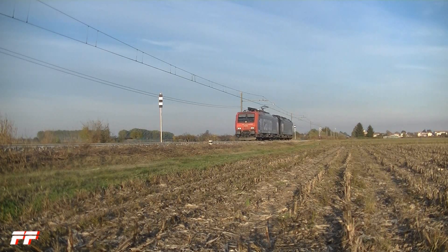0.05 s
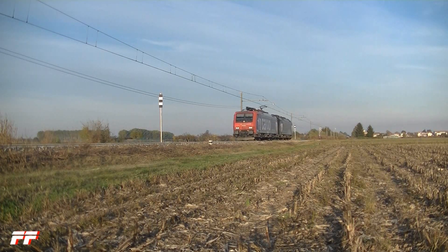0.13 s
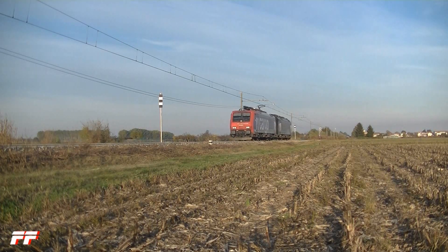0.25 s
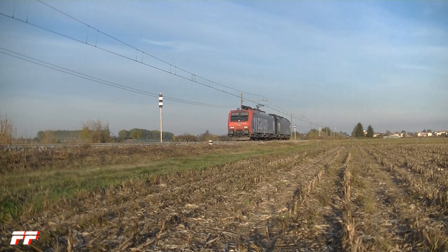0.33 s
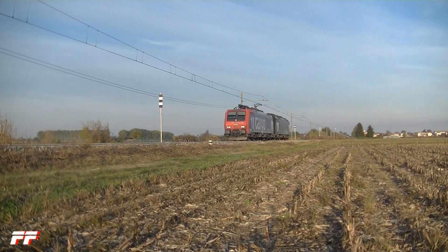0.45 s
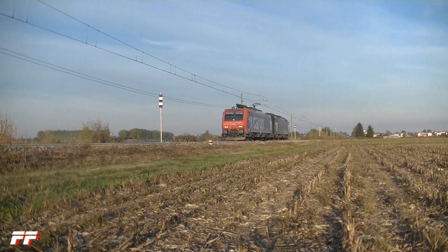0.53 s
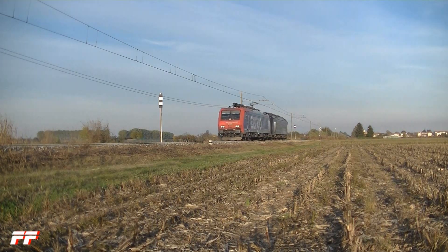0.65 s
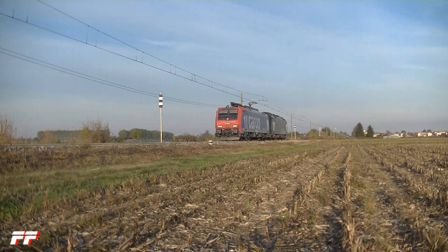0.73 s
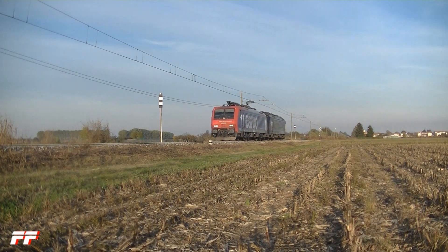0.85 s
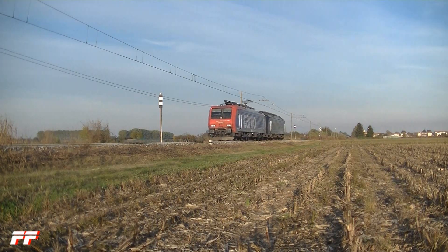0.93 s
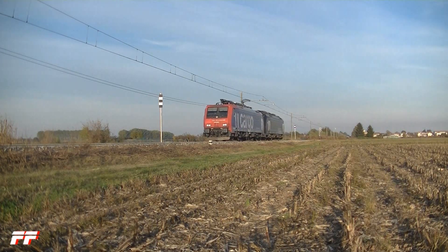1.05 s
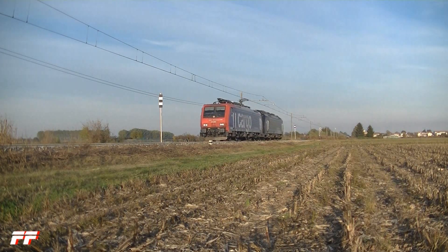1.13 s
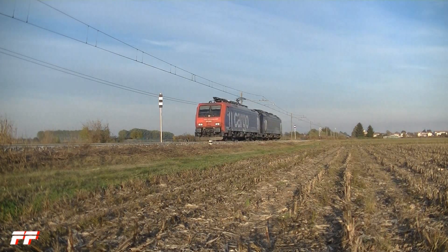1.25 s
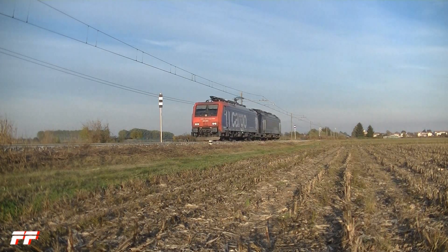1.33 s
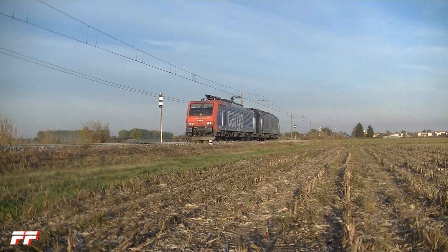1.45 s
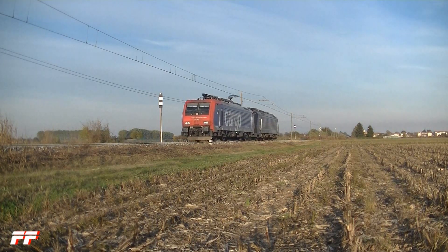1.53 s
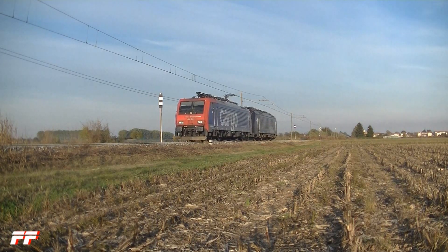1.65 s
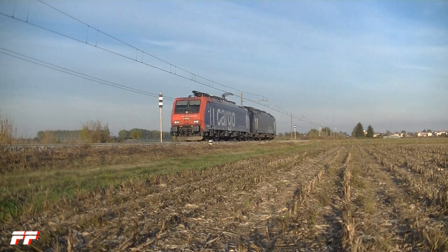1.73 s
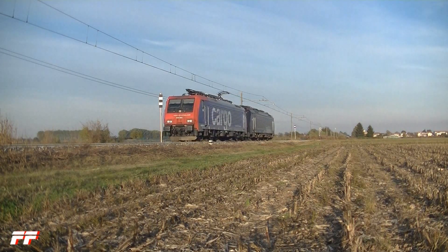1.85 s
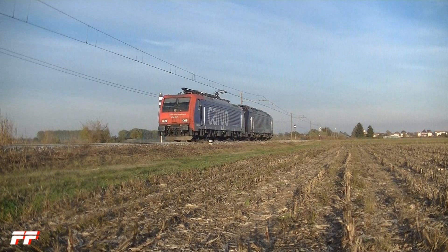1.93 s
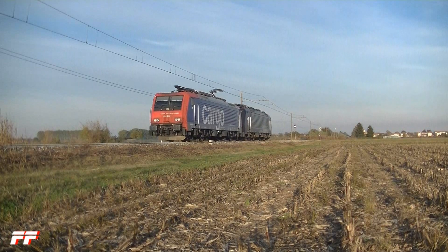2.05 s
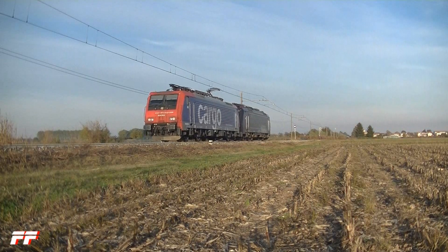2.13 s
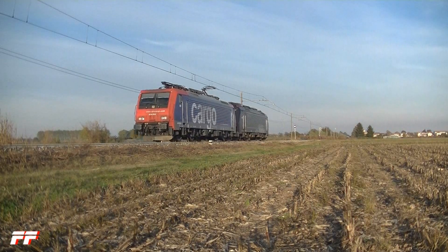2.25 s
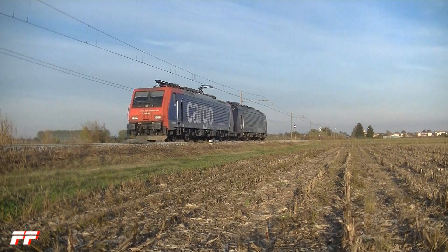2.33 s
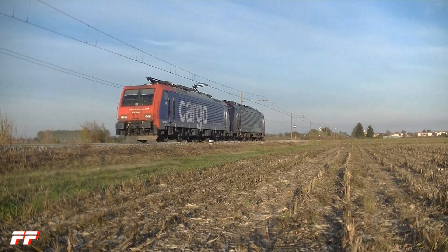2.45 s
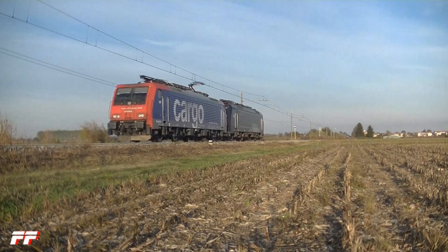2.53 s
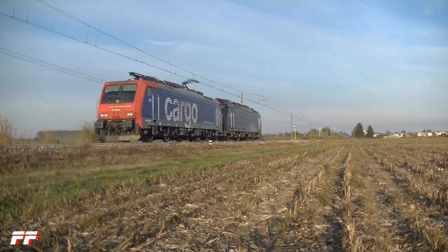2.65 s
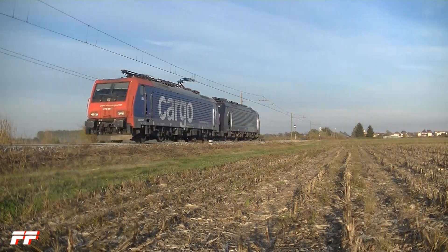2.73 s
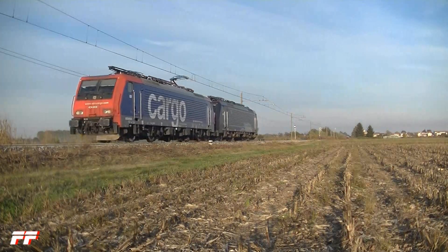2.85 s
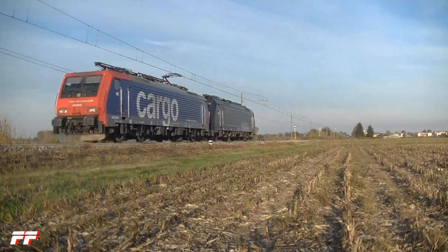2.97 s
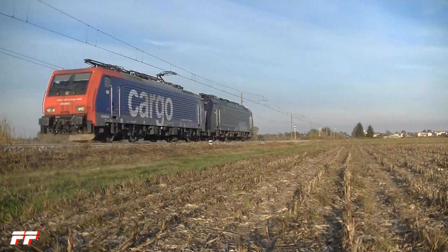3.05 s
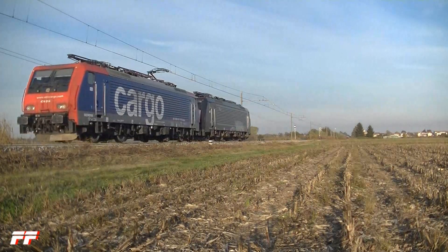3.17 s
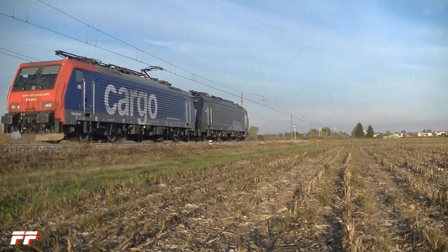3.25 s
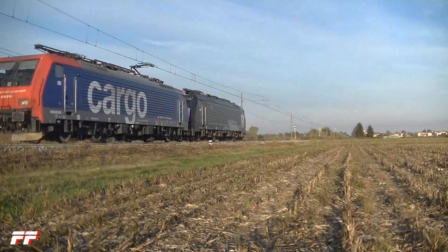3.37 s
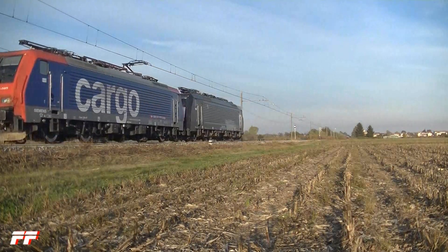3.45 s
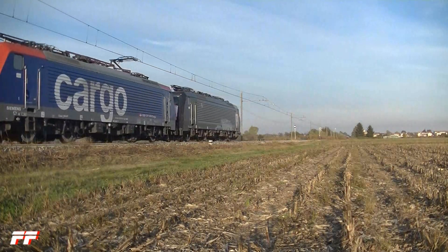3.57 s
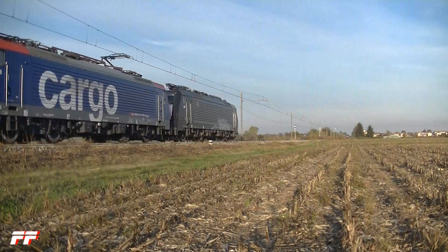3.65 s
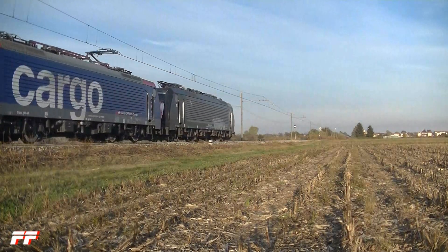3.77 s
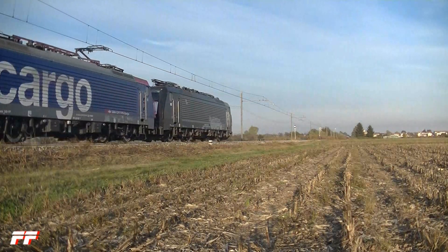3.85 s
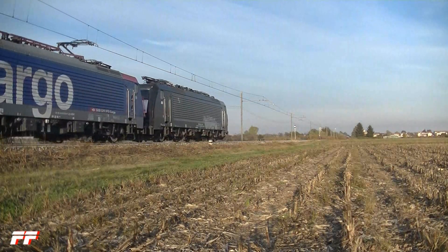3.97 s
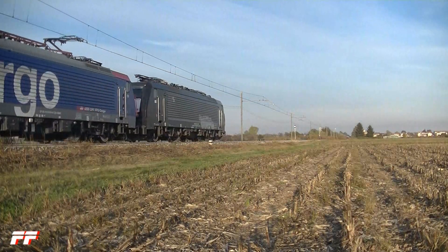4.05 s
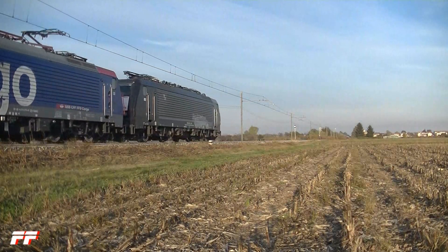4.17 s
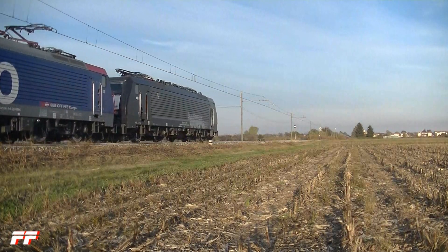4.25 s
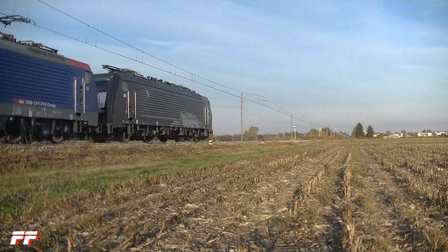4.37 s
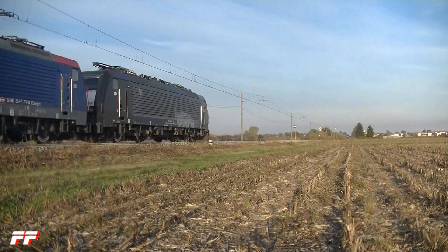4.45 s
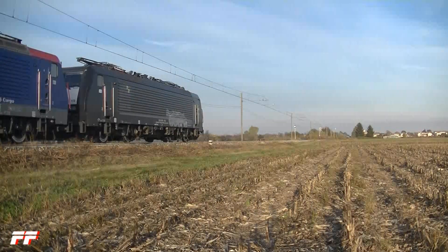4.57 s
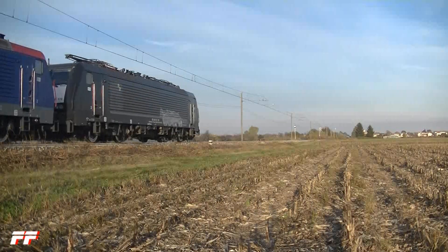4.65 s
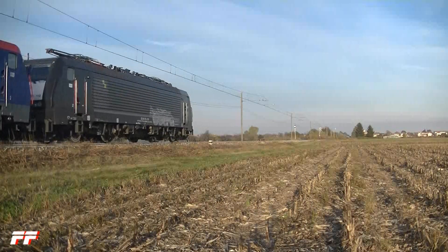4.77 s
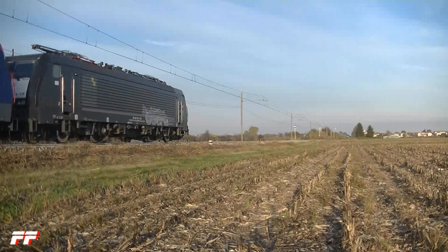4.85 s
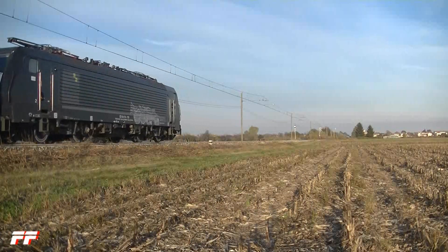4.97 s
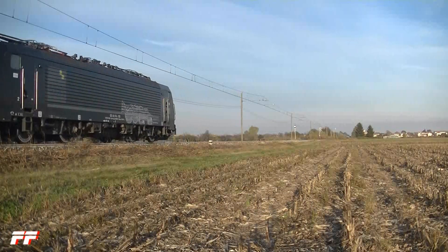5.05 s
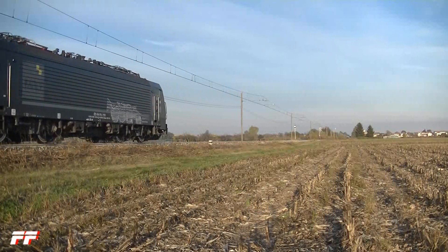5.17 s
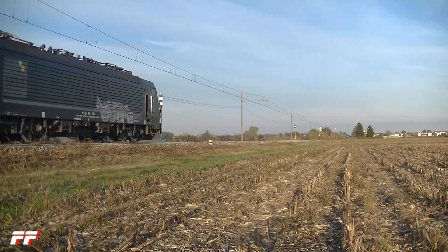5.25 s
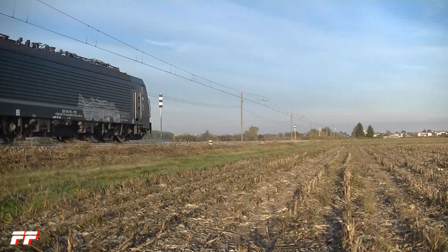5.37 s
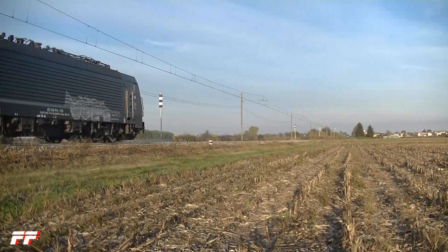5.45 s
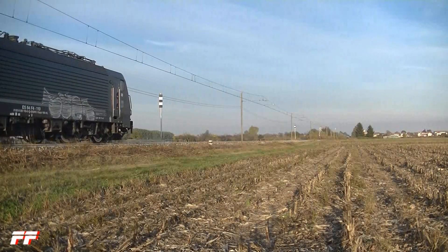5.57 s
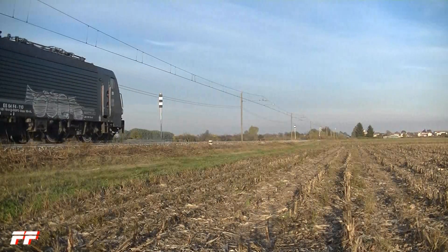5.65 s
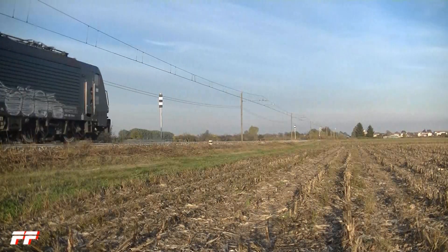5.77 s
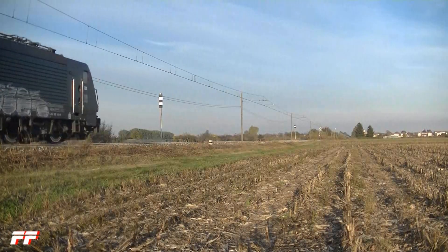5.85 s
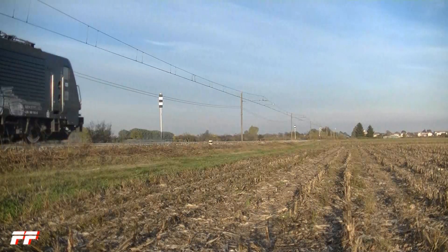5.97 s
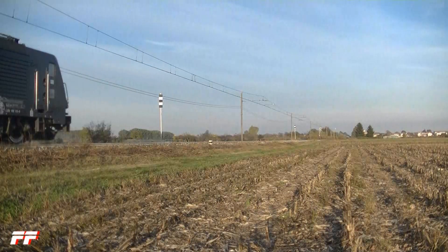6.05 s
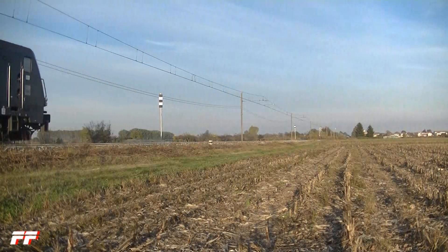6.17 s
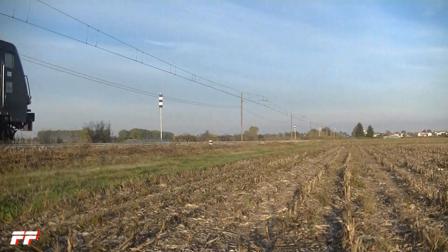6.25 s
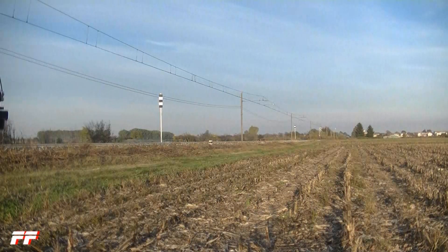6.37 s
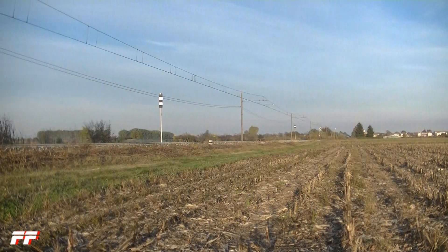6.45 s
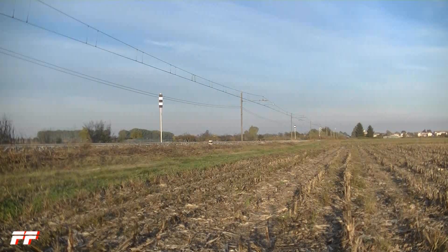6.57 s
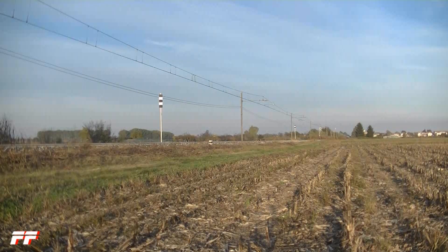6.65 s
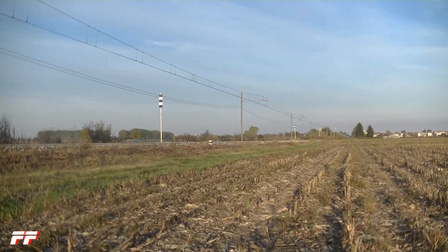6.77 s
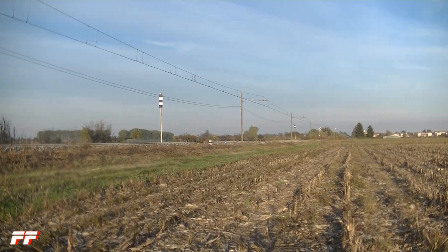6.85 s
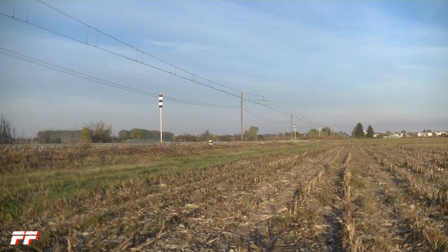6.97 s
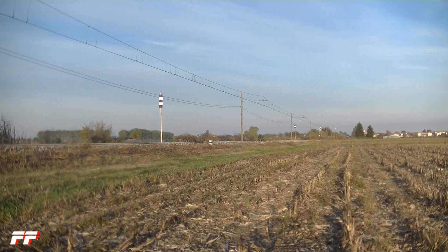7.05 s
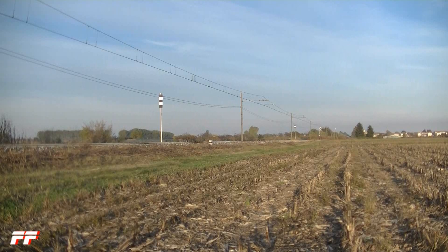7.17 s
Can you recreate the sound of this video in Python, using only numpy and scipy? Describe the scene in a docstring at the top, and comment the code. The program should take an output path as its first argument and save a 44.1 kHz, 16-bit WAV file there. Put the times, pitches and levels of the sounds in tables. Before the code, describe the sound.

An electric engine pair rolls by at moderate speed: gliding motor whine, ringing wheels, a brief metallic clatter, then falling roar in open air.

```python
"""An open field beside a railway: two coupled electric locomotives roll past, about 14 m away, under 50 km/h.
Motor drives whine in stacks of sine lines, Doppler-bent bogie by bogie; the second locomotive is quieter.
Filtered noise makes the roar, rumble, ring, hiss and scuffs of wheel on rail, over a bed of air and hiss.
Gliding tones flare up, a short clatter buzzes, and the sound swings from ahead to the left."""
import sys
import numpy as np
from scipy import signal
from scipy.fft import irfft, next_fast_len
from scipy.io import wavfile
from scipy.ndimage import uniform_filter1d

SR = 44100
rng = np.random.default_rng(int(sys.argv[2]) if len(sys.argv) > 2 else 0)


def materialize(psi):
    """Save the field psi as 16-bit PCM at rate SR to the path in sys.argv[1].

    A 1-D psi becomes a single channel; in a 2-D psi each row is a channel.
    """
    bounded = np.clip(np.atleast_2d(psi).T, -1, 1)
    quanta = np.round(bounded * 32767).astype(np.int16)
    wavfile.write(sys.argv[1], SR, quanta)


N = 317961
TIME = np.arange(N) / SR  # seconds
FRAME = 2048  # samples per short-time spectrum
SPEED_M_S, DISTANCE_M, SOUND_M_S = 13.4, 14.0, 343  # train, nearest distance to the track, speed of sound
DRIVE_HZ, MESH_ORDER = 86.98, 12  # repeat rate of the drive at rest; its multiple that is the gear whine
TURN_S, TURN_SHARE = 4.8, 0.87  # middle of the turn; how far it goes (0 head-on, 1 from the side)
BEAT_HZ, BEAT_DB, BEAT_CREST_S = 1.12, 1.8, 3.98  # slow beat of the gear whine: rate, depth, one crest
AIR_DB = -71.2
TOP_HZ = 16300

# bogies, levels relative to one another: abreast_s, level_db
BOGIES = [(4.84, -0.5), (5.66, -2), (6.351, -22), (7.2, -19)]
# motor lines: multiples of the drive's repeat rate
MOTOR_ORDERS = [6, 9, 13, 17, 18, 19, 20, 21, 22, 23, 24, 25, 26, 36, 37]
# balance of those lines, head-on and from the side: level_db
MOTOR_AHEAD_DB = [-33, -17.5, -17, -14, -16.5, -17, -10, -7.5, -3, -8, -5, -8.5, -3.5, -26, -22]
MOTOR_SIDE_DB = [-16, -7.5, 0, -18, -13, -27, -12, 1, -2, -1, -6, 1, -13, -21, -5]
# swells and dropouts of the gear whine: centre_s, half_length_s, change_db
GEAR_SWELLS = [(0.35, .3, 4), (1.3, .12, 3), (2.05, .22, -4), (3.85, .15, 4.5), (5.34, .035, -8),
               (5.61, .02, 6), (5.7, .03, -6), (5.94, .02, -10), (6.345, .03, -17), (6.43, .03, 5.5),
               (6.52, .02, -6), (6.6, .07, 4), (6.93, .15, 6), (7.17, .05, -9)]
# motor lines beamed by their housings: centre_s, half_length_s, rest_pitch_hz, bogie_abreast_s, level_db
BEAMS = [(1.76, .07, 2262, 4.84, -58), (2.256, 0.04, 2263, 4.4, -49), (2.524, 0.074, 2260, 4.84, -50.5),
         (3.9, 0.087, 2258, 5, -43.5), (4.5, .2, 2263, 4.9, -42), (4.95, .13, 2263, 5.4, -42),
         (4.81, 0.025, 783, 4.84, -46), (4.9, 0.26, 522, 4.84, -59.5), (5.003, 0.29, 254, 4.84, -57),
         (5.046, .13, 2092, 5.66, -43), (4.2, .15, 3135, 4.84, -52), (5.7, .22, 3135, 5.66, -46.5),
         (5.747, .12, 1895, 5.66, -43), (6.3, 0.18, 1913, 5.62, -43)]
# how each named sound passes: abreast_level_db, middle_abreast_s, source_half_length_m, field_loss_db_per_m
PASSES = {"gear": (-41.3, 5.35, 6.5, .43), "motors": (-40.2, 4.85, 4, .225),
          "ring": (-36.9, 5.0, 1.2, .305), "roar": (-38.3, 5.7, 7, .188), "rumble": (-48, 6.35, 7.5, .365),
          "hiss": (-51.4, 6.09, 1.5, .228)}
# spectral shape of the rolling roar: frequency_hz, level_db
ROAR_AHEAD = [(250, -41), (430, -21), (540, -6.5), (660, -10.5), (810, -1.5), (910, -3), (1100, 4),
              (1400, -0.5), (2400, 3.5), (3500, -0.5), (4450, 2.5), (5200, -3), (6200, -19), (9000, -57)]
ROAR_SIDE = [(250, -56), (460, -9.5), (530, 0), (630, -2.5), (760, 4.5), (880, -2), (1080, 4), (1280, -3.5),
             (1800, 4), (3150, 3), (3500, -2.5), (4500, -6), (5700, -18), (9000, -123)]
# spectral shape of the body rumble: frequency_hz, level_db
RUMBLE_AHEAD = [(20, -42), (48, -33), (72, -32), (100, -35), (130, -13), (155, 1.5), (200, -3), (260, 6.5),
                (320, 4), (390, -2.5), (470, 2), (800, -33)]
RUMBLE_SIDE = [(20, -47), (48, -32), (72, -44), (100, -21), (130, -17), (155, -9.5), (200, -7), (250, 1.5),
               (320, 1.5), (390, 2), (470, -14), (700, -47.5)]
# spectral shape of the contact hiss: frequency_hz, level_db
HISS_AHEAD = [(4000, -25), (6300, -9.5), (7400, -5.5), (8100, -6), (8900, -18.5), (10200, -14.5),
              (11200, -22), (12500, -32), (14500, -43), (16000, -43)]
HISS_SIDE = [(4000, -24), (6000, 4), (7300, 1), (8000, -6), (8700, -14.5), (10500, -14.5), (12000, -23),
             (14500, -36), (15800, -38)]
# ringing of the wheel discs, before Doppler: rest_frequency_hz, level_db
RING = [(1200, -56), (1600, -6.5), (1850, -5), (2080, 1.5), (2200, 4.5), (2300, -2), (2420, -14),
        (2900, -47.5), (10500, -48), (14000, -59)]
# wheels scuffing the rail: centre_s, half_length_s, centre_hz, width_octaves, level_db
SCUFFS = [(1.38, 0.11, 3900, .06, -59.5), (1.56, 0.11, 4660, 0.058, -61.5), (4.87, .06, 7400, 0.39, -64),
          (5.2, .45, 10200, .11, -71), (5.61, 0.013, 5440, 0.26, -50), (6.358, .02, 6900, 0.15, -49.5),
          (6.898, 0.15, 1480, 0.14, -43)]
# knocks in the running gear, levels before the rise softens them: start_s, decay_s, level_db
KNOCKS = [(6.216, 0.0065, -29.5), (6.226, 0.04, -28.2), (6.243, 0.012, -26.5), (6.271, .012, -36)]
# resonances of the steel, levels relative: centre_hz, width_hz, level_db
STEEL = [(593, 340, -12), (1310, 200, -10), (2080, 220, -5), (2630, 520, 1), (3320, 280, -2),
         (4130, 860, -6), (6740, 1200, -14), (9500, 3500, -27)]
# spectral shape of still air and microphone hiss: frequency_hz, level_db
AIR = [(30, 0), (70, -16), (110, 6), (170, 22), (400, 12), (650, 22.5), (1500, 4), (5000, -3), (10000, -1),
       (14000, -4), (16000, -21)]
# left minus right at the microphone ports: frequency_hz, difference_db
PAN_AHEAD = [(40, 2), (130, 1), (340, -1), (1030, 0), (2070, -0.3), (3100, -3.5), (4500, -1.3),
             (6000, -3.5), (7200, 6), (8500, 0.5), (10000, -4), (15000, 2)]
PAN_SIDE = [(40, 2), (130, -1.5), (340, -0.6), (1030, 1.2), (2070, 4.5), (3100, 12), (4500, -1),
            (6000, 5.5), (7200, 2), (8500, -3), (10000, -6), (13000, 3)]
# phase lead of the left port, fully from the side: frequency_hz, lead_rad
LEAD_SIDE = [(40, .1), (170, .03), (340, .1), (1030, .7), (2070, .85), (3100, .7), (4500, .6), (7200, .2),
             (10000, -.4), (15000, 0)]
# noise that differs between the ports, against the shared noise: frequency_hz, level_db
UNLIKE_AHEAD = [(40, -9), (150, -22), (400, -15), (2000, -21.5), (3100, -17), (4500, -22), (7200, -0.5),
                (10000, -4), (15000, -1)]
UNLIKE_SIDE = [(40, -10), (150, -65), (400, -42), (1000, -12), (2100, -6), (3100, -29), (4500, -1),
               (7200, -6.5), (10000, 0.5), (15000, 3)]


def whine():
    """The gear mesh tone and the motor stack, whose balance changes as the bogies turn their sides to us."""
    view = aspect(TIME)
    mesh = drive([MESH_ORDER], [0], waver_db=-9, skirt_db=-9, skirt_hz=28)
    mesh = steady(mesh, seconds=0.05)
    ahead = drive(MOTOR_ORDERS, MOTOR_AHEAD_DB, waver_db=-5, skirt_db=-11, skirt_hz=12)
    side = drive(MOTOR_ORDERS, MOTOR_SIDE_DB, waver_db=-5, skirt_db=-10, skirt_hz=12)
    motor = steady(ahead * np.sqrt(1 - view) + side * np.sqrt(view), seconds=0.2)
    motor_db = passing("motors", TIME) + unrest(TIME, per_s=18, depth_db=1.8)
    return mesh * undb(gear_level()) + motor * undb(motor_db)


def drive(orders, levels_db, waver_db, skirt_db, skirt_hz):
    """Every bogie's lines: steady tone, slow waver and skirt of load jitter, bent by the travel time."""
    size = next_fast_len(N + SR)
    hz = np.arange(size // 8) * SR / size
    waver_hz = 4
    spectrum = np.zeros(len(hz))
    for order, db in zip(orders, levels_db):
        off = np.abs(hz - order * DRIVE_HZ)
        tone = off == off.min()
        waver, skirt = np.exp(-off / waver_hz), np.exp(-off / skirt_hz)
        waver = undb(waver_db) ** 2 * waver / waver.sum()
        skirt = undb(skirt_db) ** 2 * skirt / skirt.sum()
        spectrum += undb(db) ** 2 * (tone + waver + skirt)
    out = 0
    for abreast, db in BOGIES:
        random_phase = np.exp(2j * np.pi * rng.random(len(hz)))
        source = irfft(np.sqrt(spectrum) * random_phase, size)
        sent, r = sent_at(abreast)
        # reading half a second in leaves room for the travel time
        heard = np.interp((sent + 0.5) * SR, np.arange(size), source)
        out = out + undb(db) / r * heard
    return out / np.std(out)


def gear_level():
    """The gear whine passes, beats slowly, flutters, and here and there swells or drops out; in dB."""
    beat = BEAT_DB * np.cos(2 * np.pi * BEAT_HZ * (TIME - BEAT_CREST_S))
    swells = sum(db * bump(TIME, s, length) for s, length, db in GEAR_SWELLS)
    return passing("gear", TIME) + beat + swells + unrest(TIME, per_s=24, depth_db=3.2)


def beams():
    """Clean gliding tones that swell and flutter as the lobes of the housings sweep by."""
    knots = np.arange(0, 8, 1 / 25)  # 25 random values per second
    out = np.zeros(N)
    for s, length, hz, abreast, db in BEAMS:
        near = np.abs(TIME - s) < 4 * length
        t = TIME[near]
        flutter = np.interp(t, knots, rng.standard_normal(len(knots)))
        wobble = np.interp(t, knots, rng.standard_normal(len(knots)))
        sent, _ = sent_at(abreast)
        phase = 2 * np.pi * hz * sent[near] + 0.35 * wobble
        swell = np.exp(-((t - s) / (2 * length)) ** 2)
        out[near] += np.sqrt(2) * undb(db + 2.5 * flutter) * swell * np.sin(phase)
    return out


def rolling(hz, t):
    """Rough steel on steel drives rails, wheel discs and bodies; power per frequency and moment."""
    view = aspect(t)
    rough_db = unrest(t, per_s=14, depth_db=0.6)  # the rail is rougher in some places
    roar_shape = blend(ROAR_AHEAD, ROAR_SIDE, view, hz)
    roar = power(roar_shape, passing("roar", t) + rough_db, hz, band=(2600, 5200))
    hiss_shape = blend(HISS_AHEAD, HISS_SIDE, view, hz)
    hiss = power(hiss_shape, passing("hiss", t) + rough_db, hz, band=(6000, 9000))
    rumble_shape = blend(RUMBLE_AHEAD, RUMBLE_SIDE, view, hz)
    rumble_db = passing("rumble", t) + unrest(t, per_s=6, depth_db=1.1)
    rumble = power(rumble_shape, rumble_db, hz, band=(120, 450))
    # the ring sinks in pitch as the wheels go by
    along = SPEED_M_S * (t - 5.4)
    doppler = 1 + SPEED_M_S / SOUND_M_S * along / np.hypot(along, DISTANCE_M)
    ring_db = passing("ring", t) + unrest(t, per_s=18, depth_db=1.4)
    ring = power(colour(RING, hz * doppler), ring_db, hz, band=(1750, 2420))
    return roar + hiss + rumble + ring


def scuffs(hz, t):
    """Short swells of bright friction noise where a wheel slides; power per frequency and moment."""
    out = 0
    for s, length, centre, octaves, db in SCUFFS:
        shape = np.exp(-0.5 * (np.log2((hz + 1) / centre) / octaves) ** 2)
        out = out + shape / shape.mean() * undb(db) ** 2 * bump(t, s, length)
    return out


def clatter():
    """Each knock sets the damped resonances of wheel and rail buzzing."""
    rise_s = 0.001
    force = 0  # summed as power
    for s, decay_s, db in KNOCKS:
        age = np.maximum(TIME - s, 0)
        rise = 1 - np.exp(-age / rise_s)
        decay = np.exp(-np.minimum(age / decay_s, 20))
        force = force + (undb(db) * rise * decay) ** 2
    steel = 0
    for hz, width, db in STEEL:
        mode = band_noise(hz - width / 2, hz + width / 2, N)
        steel = steel + undb(db) * mode / mode.std()
    return np.sqrt(force) * steel / steel.std()


def ticks(start, end, centre_hz, ring_s, db, count):
    """Faint, very high ticks while the train is still far off: random strikes on a short ringing band."""
    strikes = np.zeros(N)
    when, size = rng.random((count, 2)).T
    moments = start + when * (end - start)
    strikes[(moments * SR).astype(int)] = 0.5 + size / 2
    t = TIME[:SR // 20]
    ring = band_noise(centre_hz / 1.07, centre_hz * 1.07, len(t))
    ring = ring / ring.std() * np.exp(-t / ring_s)
    return undb(db) * signal.fftconvolve(strikes, ring)[:N]


def air(hz):
    """Power density of the quiet field: still air and microphone hiss."""
    return power(colour(AIR, hz), AIR_DB, hz, band=(0, SR))


def sent_at(abreast):
    """When the sound now arriving left a bogie (s), and how far it came (m)."""
    r = np.hypot(DISTANCE_M, SPEED_M_S * (TIME - abreast))
    return TIME - r / SOUND_M_S, r


def passing(name, t):
    """Level in dB: holds while the source is abreast, falls with spreading and the loss over the field."""
    db, abreast, half_m, loss_db_per_m = PASSES[name]
    along = np.maximum(SPEED_M_S * np.abs(t - abreast) - half_m, 0)
    r = np.hypot(DISTANCE_M, along)
    return db - 20 * np.log10(r / DISTANCE_M) - loss_db_per_m * (r - DISTANCE_M)


def aspect(t):
    """How the train is seen: 0 head-on, 1 from the side."""
    return TURN_SHARE * (1 + np.tanh(SPEED_M_S * (t - TURN_S) / DISTANCE_M)) / 2


def unrest(t, per_s, depth_db):
    """A random rise and fall of level in dB."""
    knots = rng.standard_normal(size=512)
    return depth_db * np.interp(t * per_s, np.arange(len(knots)), knots)


def bump(t, centre_s, half_length_s):
    """A bell-shaped rise and fall that peaks at 1."""
    return np.exp(-0.5 * ((t - centre_s) / half_length_s) ** 2)


def undb(db):
    """Decibels to gain."""
    return 10 ** (np.asarray(db) / 20)


def steady(x, seconds):
    """Hold the running rms at 1."""
    return x / np.sqrt(uniform_filter1d(x * x, int(seconds * SR)) + 1e-18)


def band_noise(low_hz, high_hz, count):
    """White noise through a resonant band."""
    sos = signal.butter(2, [low_hz, high_hz], "band", fs=SR, output="sos")
    return signal.sosfilt(sos, rng.standard_normal(count))


def colour(points, hz):
    """A table of frequency and value, read on a log-frequency axis."""
    f, value = np.transpose(points)
    return np.interp(np.log(hz + 1), np.log(f), value)


def blend(ahead, side, view, hz):
    """A spectrum that turns from its head-on to its side shape."""
    return colour(ahead, hz) * (1 - view) + colour(side, hz) * view


def power(shape_db, level_db, hz, band):
    """Power density of a noise that has the given level inside a band."""
    p = undb(shape_db) ** 2
    inside = (hz > band[0]) & (hz < band[1])
    return p / np.mean(p * inside, axis=0) * undb(level_db) ** 2


def cells(x):
    """Short-time spectrum: frequencies as a column, times, complex cells."""
    hz, t, z = signal.stft(x, SR, nperseg=FRAME)
    return hz[:, None], t, z


def noise():
    """Short-time spectrum of white noise of rms 1."""
    return cells(rng.standard_normal(N))[2]


def scene():
    """The train moves round to the left: level and phase between the ports shift, band by band."""
    hz, t, direct = cells(whine() + beams() + clatter())
    view = aspect(t)
    roll = np.sqrt(rolling(hz, t) + scuffs(hz, t) + air(hz))
    sign = np.array([1, -1])[:, None, None]  # left, right
    pan = undb(sign * blend(PAN_AHEAD, PAN_SIDE, view, hz) / 2)
    lead = np.exp(0.5j * sign * view * colour(LEAD_SIDE, hz))
    ports = pan * lead
    ports = ports / np.abs(ports.mean(axis=0))
    shared = noise()
    unlike = sign * undb(blend(UNLIKE_AHEAD, UNLIKE_SIDE, view, hz)) * noise()
    both = ports * (direct + roll * (shared + unlike))
    train = signal.istft(both, SR, nperseg=FRAME)[1][:, :N]
    # each tick is scaled by a random strike of 0.5 to 1
    return train + ticks(start=0.55, end=1.65, centre_hz=10200, ring_s=0.003, db=-76, count=16)


def record(dry):
    """A steep low-pass cuts the extreme treble."""
    return signal.sosfilt(signal.ellip(10, 0.2, 70, TOP_HZ, fs=SR, output="sos"), dry)


dry = scene()
out = record(dry)
materialize(out)
```